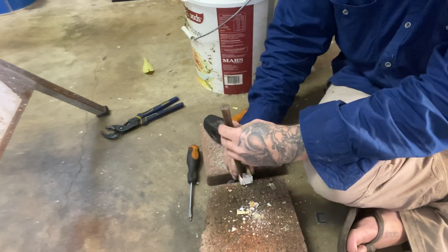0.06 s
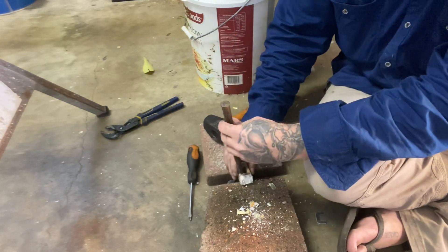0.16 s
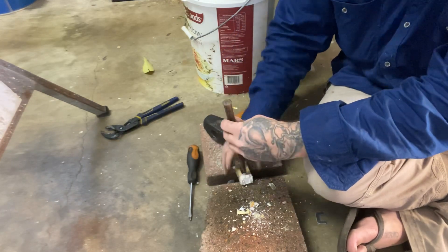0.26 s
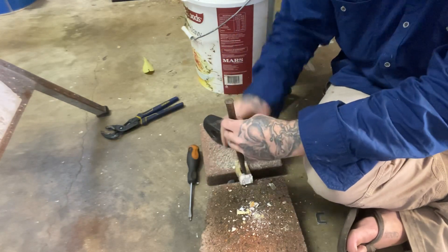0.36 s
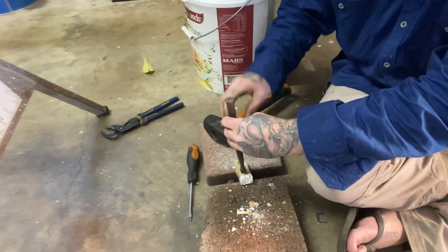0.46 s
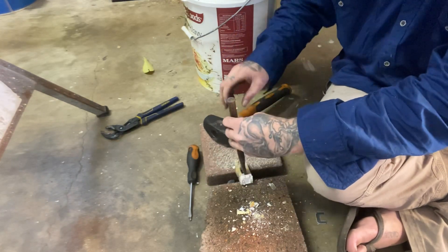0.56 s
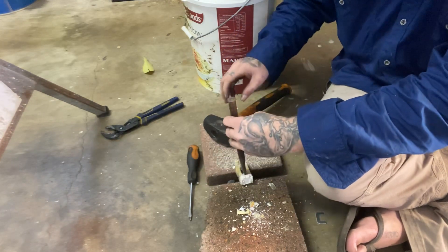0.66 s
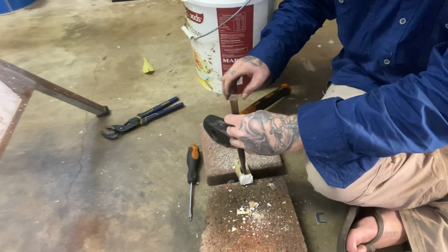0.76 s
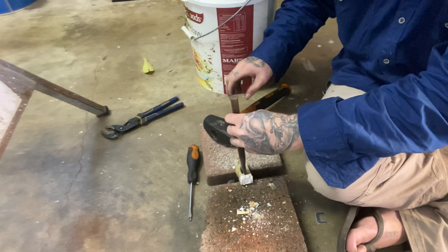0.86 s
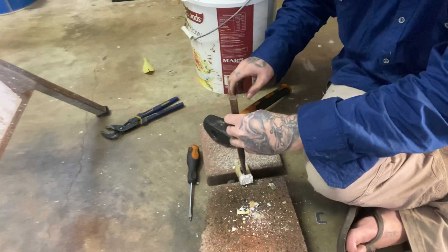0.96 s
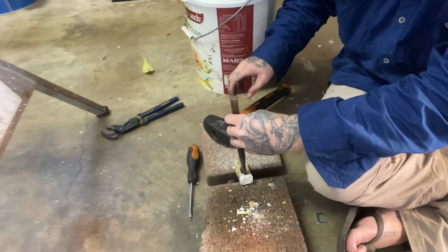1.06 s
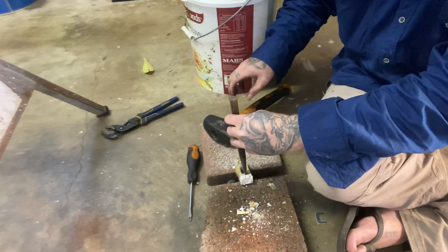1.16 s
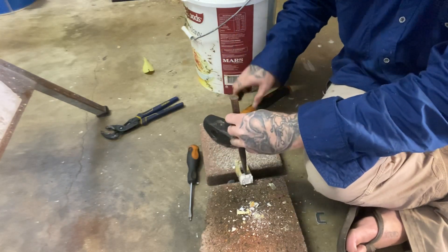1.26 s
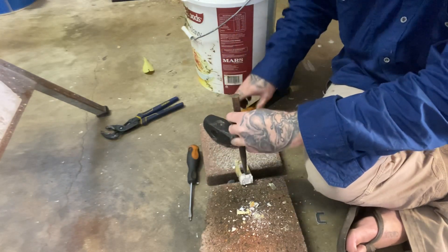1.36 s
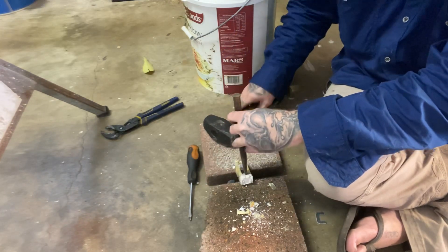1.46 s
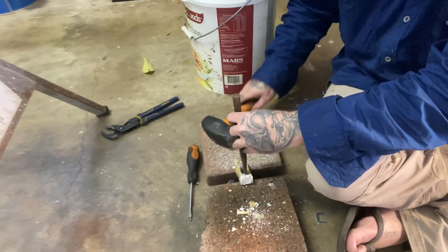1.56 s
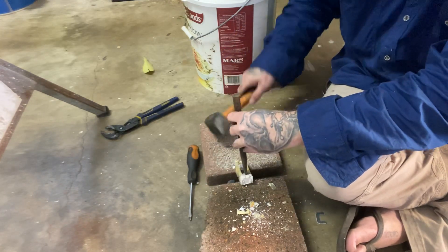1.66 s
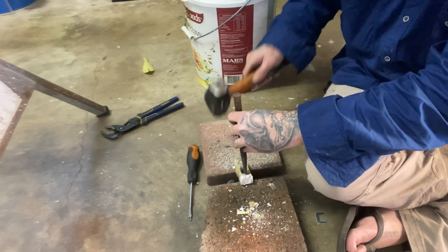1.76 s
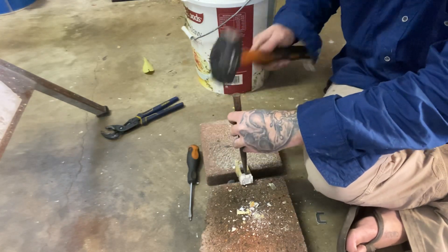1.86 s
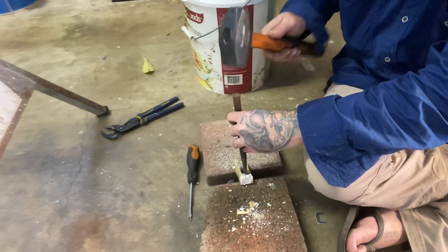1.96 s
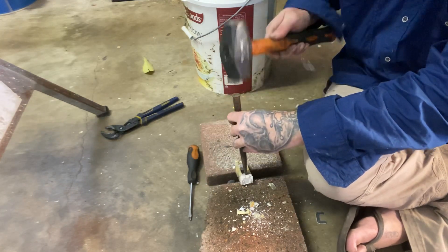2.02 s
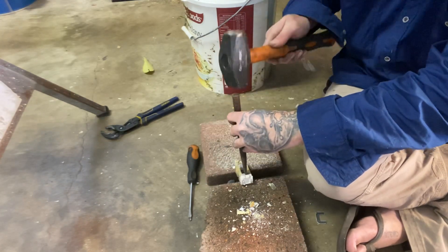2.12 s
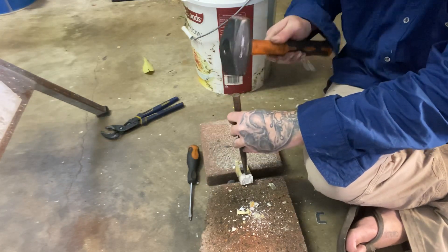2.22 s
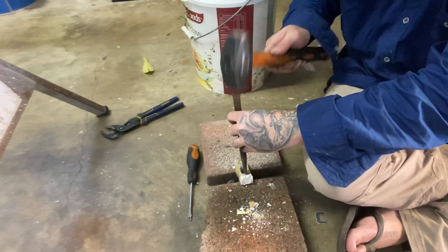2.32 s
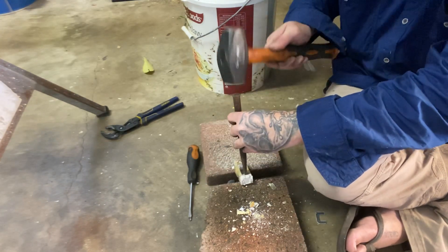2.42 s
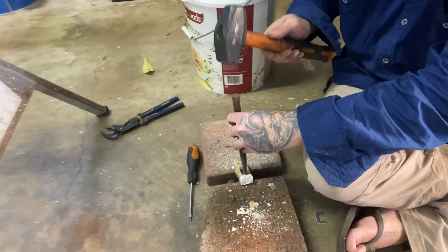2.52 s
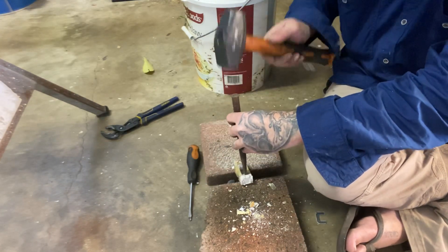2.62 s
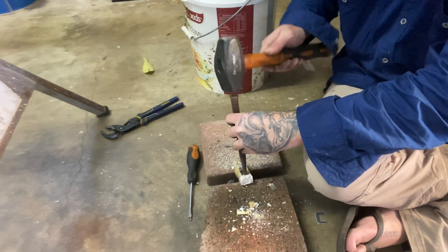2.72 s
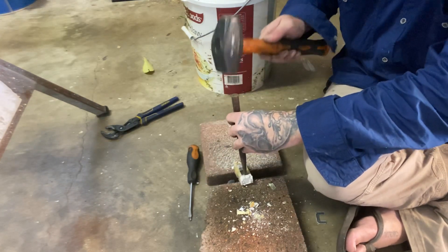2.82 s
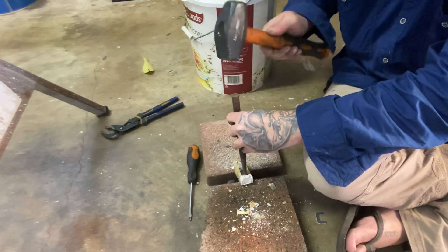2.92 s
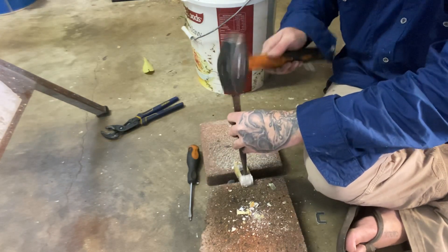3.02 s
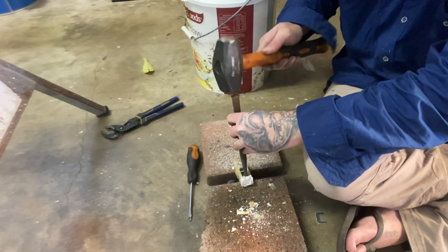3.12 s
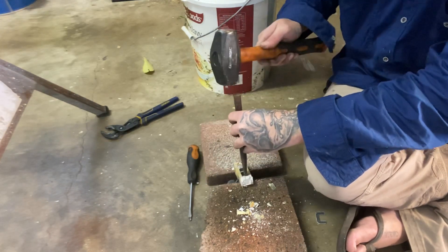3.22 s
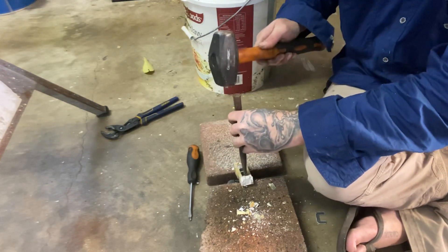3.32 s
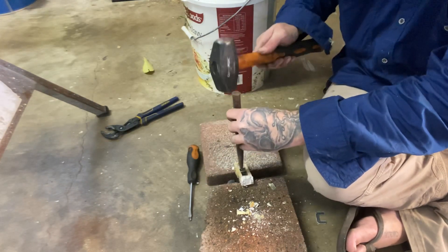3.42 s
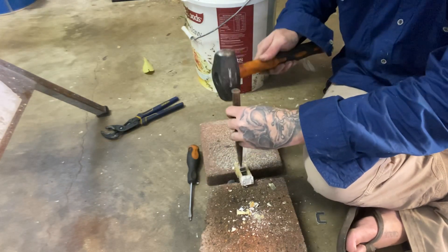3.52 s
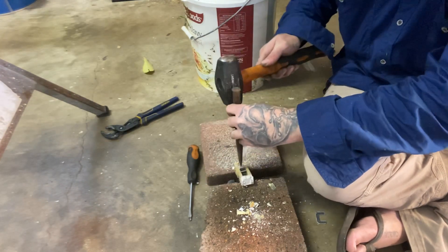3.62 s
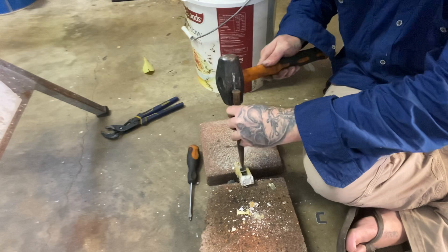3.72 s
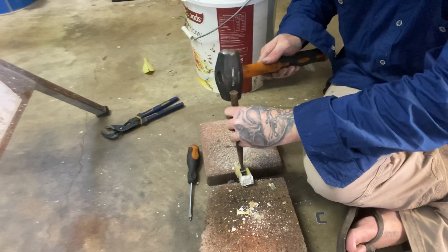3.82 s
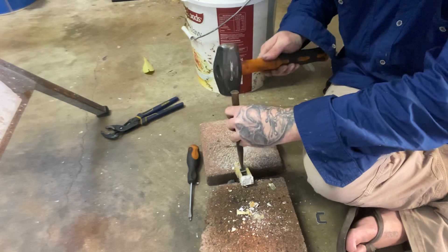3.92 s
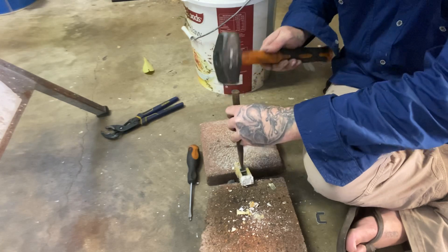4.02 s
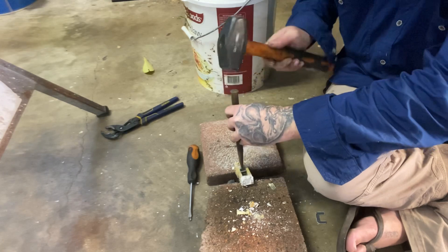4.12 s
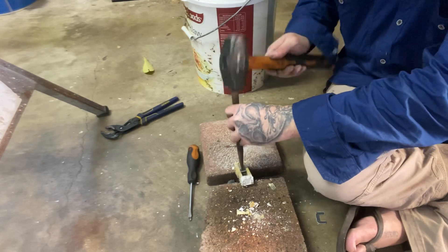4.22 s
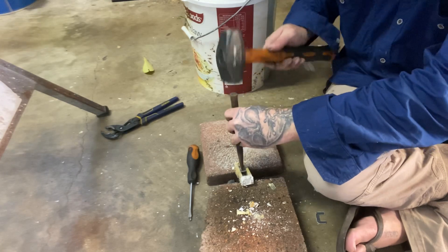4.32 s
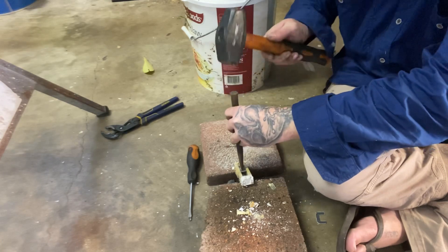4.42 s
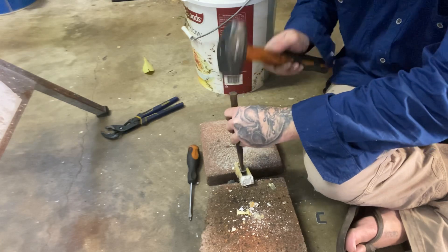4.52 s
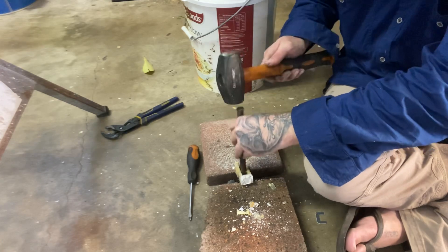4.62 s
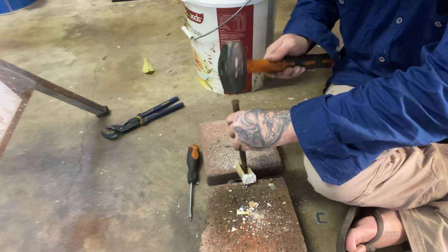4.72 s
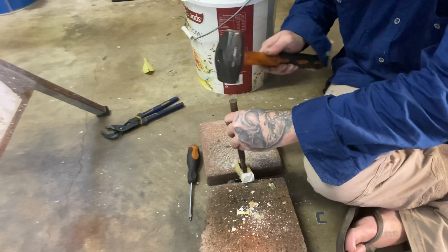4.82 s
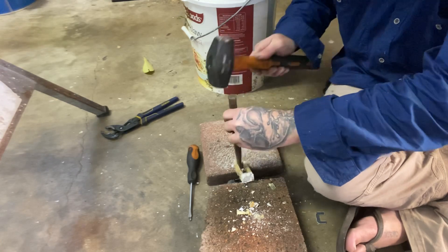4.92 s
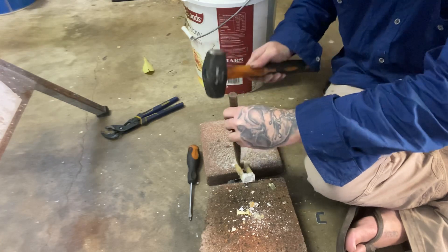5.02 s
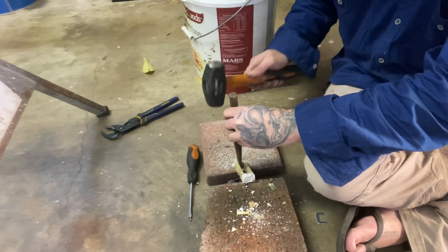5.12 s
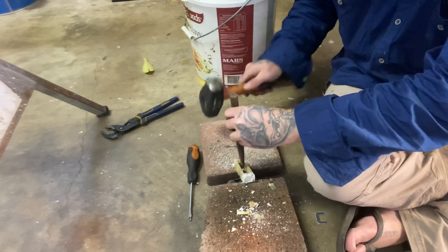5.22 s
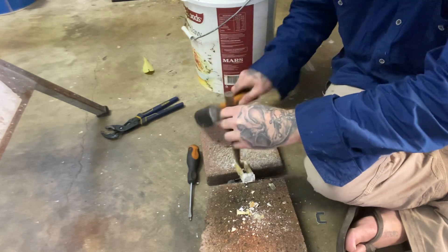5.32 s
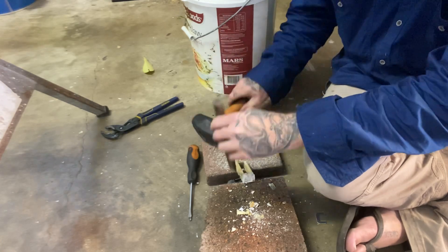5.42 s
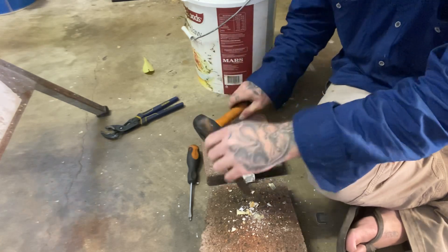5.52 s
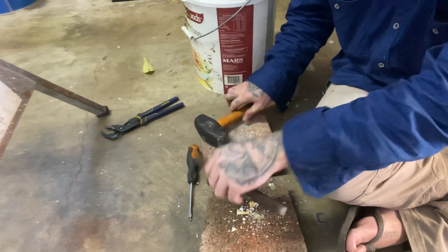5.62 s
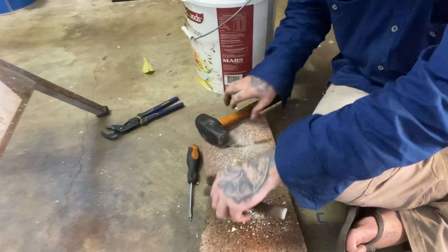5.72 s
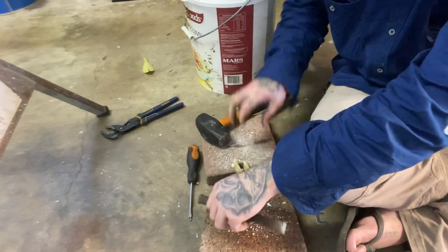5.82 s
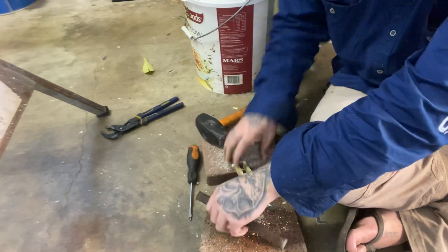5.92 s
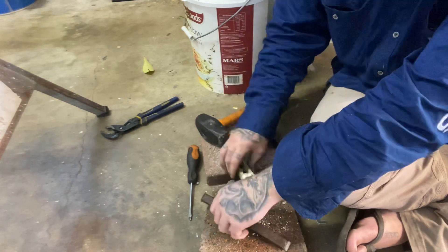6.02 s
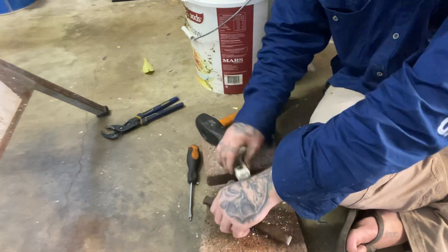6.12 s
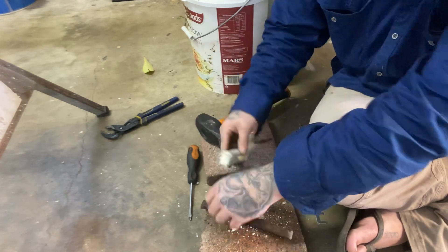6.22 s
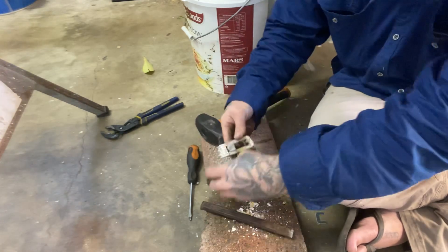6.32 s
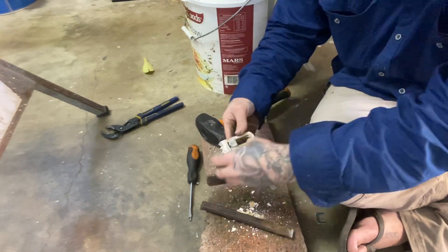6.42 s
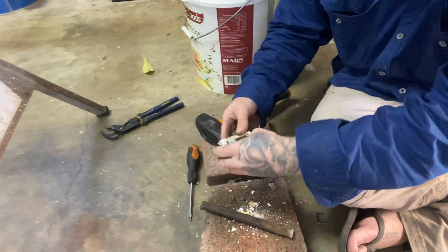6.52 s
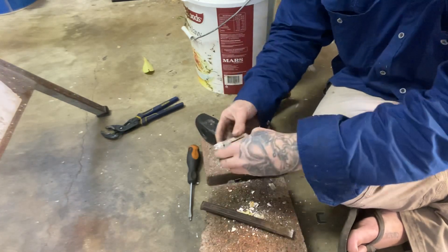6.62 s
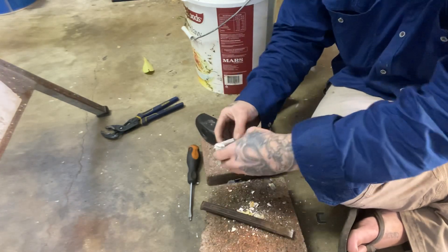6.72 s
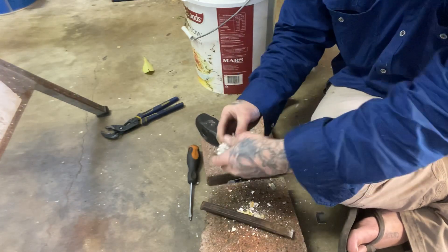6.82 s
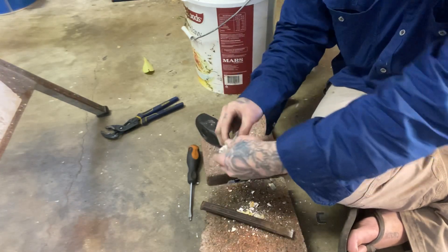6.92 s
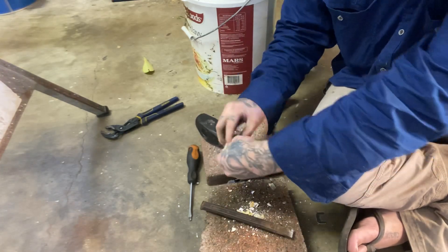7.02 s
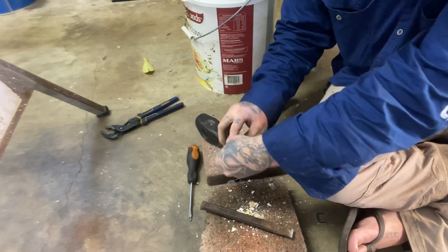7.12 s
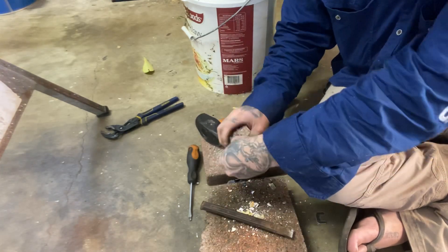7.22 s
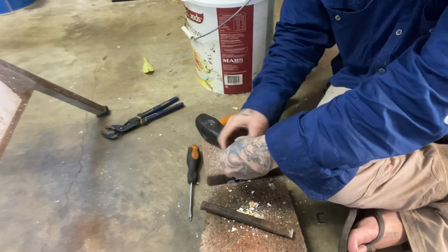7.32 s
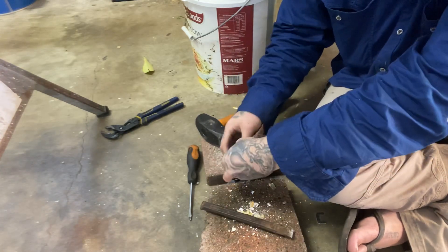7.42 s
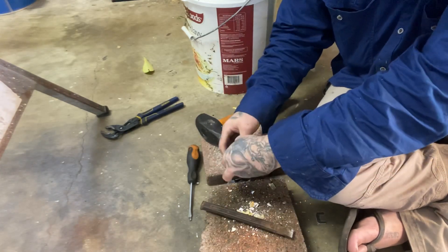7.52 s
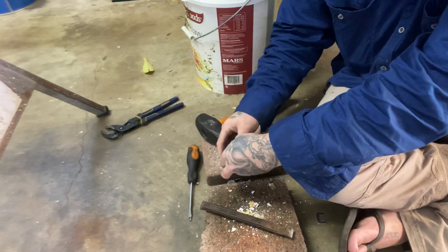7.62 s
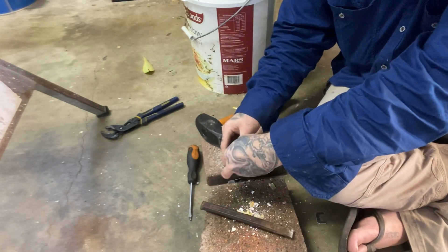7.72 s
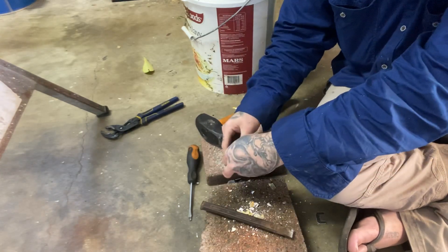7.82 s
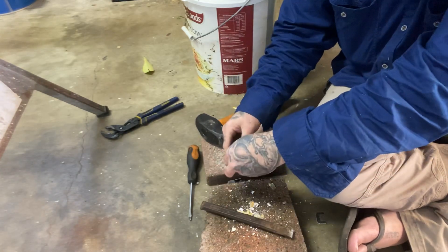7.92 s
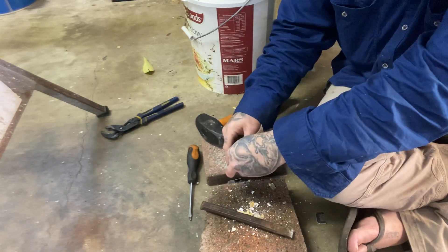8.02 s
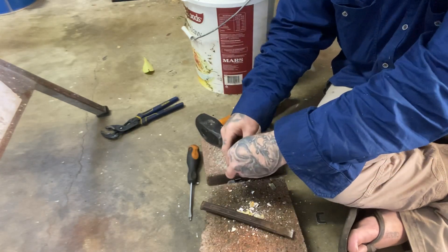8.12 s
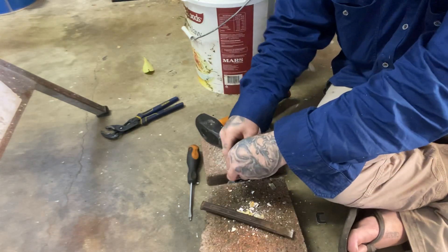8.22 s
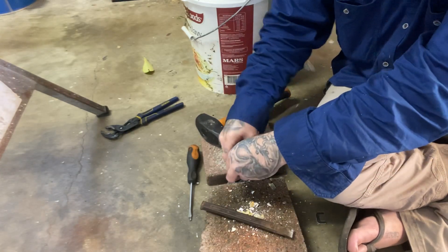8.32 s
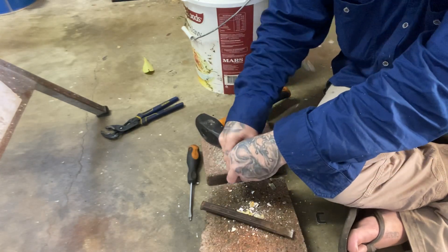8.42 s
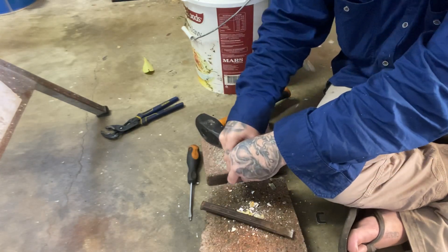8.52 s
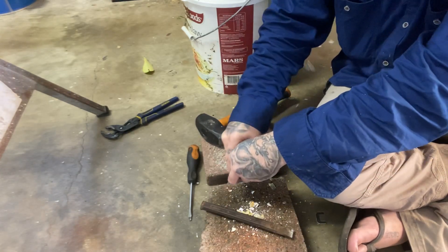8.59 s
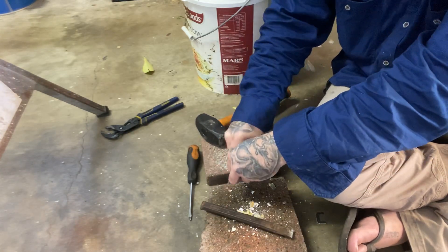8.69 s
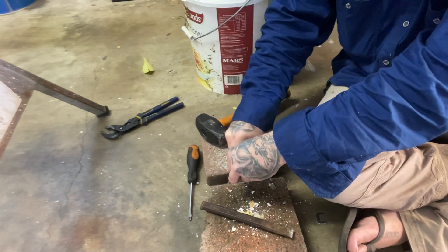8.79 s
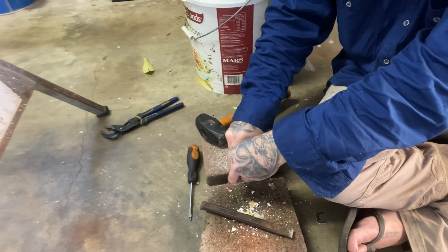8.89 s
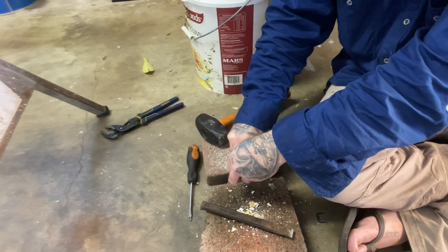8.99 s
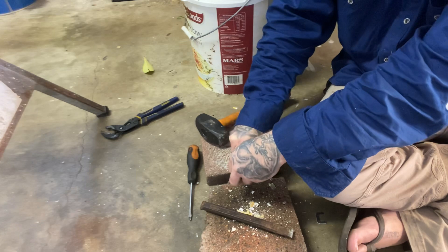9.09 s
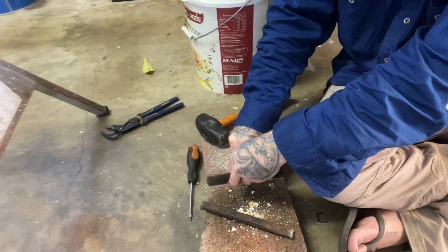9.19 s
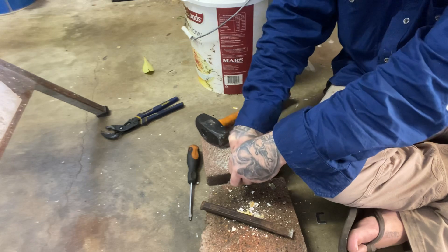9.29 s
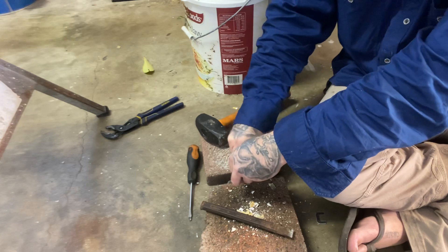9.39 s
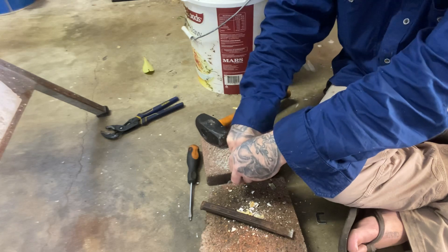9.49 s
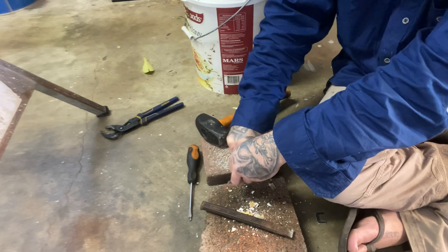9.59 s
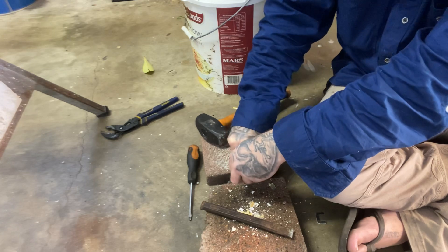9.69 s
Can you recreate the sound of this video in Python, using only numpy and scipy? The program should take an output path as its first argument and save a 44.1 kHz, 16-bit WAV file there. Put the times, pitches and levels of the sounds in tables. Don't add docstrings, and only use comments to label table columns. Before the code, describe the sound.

In a concrete garage, a club hammer cracks against a hand-held steel chisel over bricks, then tools clatter down and the chisel rings, with distant parrot screeches.

```python
import sys
import numpy as np
from scipy import signal
from scipy.fft import rfft, irfft
from scipy.io import wavfile
from scipy.ndimage import uniform_filter1d

SR = 44100
rng = np.random.default_rng(int(sys.argv[2]) if len(sys.argv) > 2 else 0)


def output_pcm(signal):
    pcm = np.clip(np.atleast_2d(signal).T, -1, 1) * 32767
    wavfile.write(sys.argv[1], SR, np.round(pcm).astype(np.int16))


def gain_from_decibels(decibels):
    exponent = np.asarray(decibels, float) / 20
    return 10 ** exponent


N = 429975
TIME_S = np.arange(N) / SR

# freq_hz, density_db_per_hz
RUMBLE_SPECTRUM = [(30, -17), (50, -10.5), (67, 4.5), (85, -2), (120, -15), (160, -27)]
# freq_hz, density_db_per_hz
SHUFFLE_SPECTRUM = [(110, -13.5), (200, -1), (280, -3), (400, 3), (550, -12.5), (1000, -17), (1400, -24)]
# freq_hz, density_db_per_hz
HISS_SPECTRUM = [(600, -20.5), (900, -2.5), (2000, -0.5), (4000, -7), (6500, -11.5), (7500, -15.5),
                 (11000, -19.5), (12500, -38)]
# peak_s, level_db, rise_s, fall_s
SHIFTS = [(0.0, -69, .1, 0.21), (0.581, -82, 0.46, 0.61), (1.11, -63.5, 0.12, .5), (1.25, -55, 0.19, 0.29),
          (1.409, -67.5, 0.086, 0.28), (1.65, -48.5, 0.31, .2), (1.98, -73, 0.46, 1), (3.94, -76, .8, 1.1),
          (5.03, -68.5, 0.33, .2), (6.2, -53.5, .3, 0.38), (5.43, -62.5, .4, .3), (6.85, -70.5, 0.15, 0.21),
          (7.3, -74, 0.39, .5), (7.55, -70.5, 0.87, 1.2), (8.85, -73.5, 0.26, 2.5), (9.3, -75.5, 0.96, 1.1)]
# loudest_s, level_db, rise_s, fall_s, first_voice_hz
SCREECHES = [(0.2, -58, .6, 0.65, 3032), (0.86, -60, 0.27, 0.7, 2930), (1.441, -59.5, 0.43, 0.66, 2923),
             (2.06, -61.5, 0.35, 0.29, 2697), (3.64, -82, 0.11, 0.38, 2790),
             (4.419, -62.5, 0.29, 0.43, 2950), (7.57, -56.5, .4, 0.55, 3170)]
# freq_hz, density_db_per_hz
RASP_SPECTRUM = [(1700, -18), (2200, -2), (4300, 2.5), (4700, -12), (6500, -2), (7100, -26)]
# peak_s, pitch_hz, level_db, rise_s, fall_s
STEADY_NOTES = [
    (2.41, 3049, -50, .06, .3),
    (2.72, 3042, -52, .02, .3),
    (3.06, 3037, -52, .02, .3),
    (4.5, 2940, -62, .2, .2),
    (5.25, 2192, -78, .3, .3),
]
SCRAPE_TIMES_S = (0.59, 3.79, 6.09, 6.55, 7.9, 8.028, 8.295, 8.48, 3.33, 4.93, 6.83, 7.06, 7.2, 0.78, 0.08)
# level_db, rise_s, fall_s
SCRAPE_SWELLS = [(-75, .05, 0.089), (-68.5, 0.078, 0.22), (-54, 0.06, 0.04), (-77.5, 0.37, 0.34),
                 (-69, 0.053, 0.091), (-69, 0.045, 0.11), (-68.5, 0.083, 0.078), (-77, 0.061, 0.086),
                 (-60, .3, 0.12), (-60, 0.14, .1), (-77, 0.44, 0.62), (-75.5, 0.17, 0.27), (-73, .15, 0.45),
                 (-72.5, 0.24, 0.35), (-74.5, .2, 0.56)]
# freq_hz, density_db_per_hz
GRIT_SPECTRUM = [(700, -8.5), (1200, -3), (2500, 0.36), (5000, -5), (10000, -5)]
# start_s, peak_db, bass_weight_db_per_octave, hardness_db_per_octave
CLICKS = [(0.569, -52, 3, 1.5), (3.744, -50, -3, 2), (3.775, -61, 2, -7), (3.933, -63, -2, -6),
          (4.784, -69.5, -4, 12), (4.82, -56, -1.5, 3), (4.862, -60, -8, 4), (4.885, -62.5, -7, 7.5),
          (6.51, -84, -6, 12.5), (6.531, -79, -5, 9), (6.558, -87, -5.5, 11), (6.669, -83, -8, 12),
          (8.67, -75.5, -3, -6), (9.713, -87, -7, 8), (3.3373, -49, -8, 6), (3.4094, -66, 4, 7.5),
          (3.4364, -63.5, 5, 3), (3.7304, -70, -4, 8), (4.7526, -47, -4, -7), (4.8105, -54, 0, 9),
          (4.8494, -51, -8, 4.5), (4.8698, -53, 0.5, 3), (4.9294, -54, -5, 8.5), (4.9494, -58, -10, 0.2),
          (5.2244, -76.5, 3.5, -2.5), (6.2724, -56, -5, 5), (6.7764, -75.5, -10.5, 14),
          (7.3224, -39.5, -5, 1.5), (7.3282, -32.5, -14, -4.5), (7.8875, -59, -2, 6),
          (7.9114, -53.5, -4, 1.5), (8.0122, -53.5, -4.5, 3), (8.031, -58.5, -6, 6), (8.06, -68.5, 1.5, 7),
          (8.149, -73.5, 2, 8), (8.4143, -61, -2, -1), (8.7994, -72, -6, 4.5), (9.3994, -71.5, -12, 7),
          (3.222, -62, -6, 9), (6.712, -80, -8, 8.5), (6.828, -72, -7.5, 4), (6.975, -76, -8, 4),
          (7.05, -78, -8, 3), (7.075, -76, -8, 3), (7.19, -74, -8, 8.5)]
# freq_hz, level_db
CLICK_BODY = [(150, 1.5), (600, -1.5), (1900, 1.5), (4600, 1.5), (10000, 1.6), (16000, -4.5)]
# start_s, peak_db, bass_weight_db_per_octave, hardness_db_per_octave
KNOCKS = [(0.214, -71, 9, -12), (1.082, -72, 2, -4), (1.102, -68, 5.5, -5), (1.171, -55.5, -7, 4),
          (1.207, -52.5, 3, -15), (1.221, -55, 3.5, -6), (1.409, -62.5, 3.5, -6), (1.601, -24, -9, -13),
          (1.648, -40, -2, -4.5), (2.045, -67, 7, -8), (6.829, -58.5, 1, -12), (6.852, -61, -2, -9.5),
          (6.876, -60, -3, -16), (6.905, -63, -2, -12), (7.135, -55, -3, -5), (7.156, -48.5, 2.5, -8),
          (7.208, -57.5, 0.86, -11), (8.756, -63.5, -1.3, -2.5)]
# freq_hz, level_db
KNOCK_BODY = [(100, 0.93), (400, 6), (1150, -0.5), (2300, 3.5), (5500, -1.7), (8800, 1)]
# freq_hz, gain_db
SOFT_CONTACT = [(1800, 0.5), (2800, -9), (6000, -21)]
# start_s, pitch_hz, level_db, t60_s
BODY_RINGS = [(2.3565, 1180, -18, .03), (2.37, 1200, -30, .15), (2.702, 290, -29, .04),
              (5.462, 3760, -42, .08), (3.04, 1750, -22, .02), (2.702, 1500, -34, .12),
              (6.1, 305, -33, 0.063), (2.354, 2150, -21.5, 0.017), (2.7, 1400, -22.5, 0.014),
              (2.6995, 1800, -19, 0.01), (3.042, 330, -23.5, .04), (4.237, 2160, -30, 0.038),
              (4.573, 2400, -25, .02), (4.62, 2210, -42, .07), (4.245, 2350, -36, .05),
              (0.57, 1300, -58, .05), (5.47, 200, -36, .08), (1.27, 1010, -66, .15),
              (1.601, 1080, -34, .015), (4.255, 1150, -40, .04), (5.67, 72, -36, 0.24),
              (2.71, 80, -38, .25), (3.05, 80, -38, .25), (5.49, 3730, -52, .12), (5.53, 1560, -37.5, .05),
              (3.04, 200, -30, .05), (2.702, 170, -32, .05), (5.462, 950, -18, 0.038),
              (5.462, 2700, -38, 0.072), (5.462, 1800, -28, .03), (1.602, 1100, -36, .02),
              (1.221, 349, -37, 0.04), (1.108, 420, -51.5, 0.0296), (6.131, 3030, -43.5, 0.096),
              (4.5855, 2300, -29, .02), (2.356, 79, -35.5, .12), (2.702, 120, -31.5, 0.1),
              (3.04, 115, -28, 0.063), (3.04, 44, -33, 0.31), (2.71, 36, -36, .25),
              (5.463, 85, -33.5, 0.13), (5.66, 105, -37, 0.11), (7.156, 1110, -57.5, 0.022),
              (5.658, 1250, -18.5, 0.013), (5.683, 1100, -32.5, 0.0069), (1.648, 1200, -39.5, 0.0093)]
HEAD_HZ = (8064, 10790, 14200, 14960, 15040, 15150)
# skidding_db, struck_db, t60_s
HEAD_MODES = [(-20.5, -13, 0.05), (-17, -19, 0.066), (-28, -8, .04), (-3, -22, .09), (4, -23, .09),
              (-4, -27, .09)]
# peak_s, level_db
SKIDS = [(3.2, -66), (3.25, -62), (3.3, -62), (3.342, -58), (3.38, -58), (3.41, -56), (3.44, -53.5),
         (4.66, -62.5), (4.75, -70), (4.814, -45), (4.845, -46), (4.872, -44), (4.9, -48), (4.935, -47),
         (4.97, -56), (5.05, -74)]
CHISEL_HZ = (1824, 2482, 3034, 4686, 4689, 6334, 8040, 8340, 11535, 12930, 14030, 15495)
# dropped_db, settling_db, tapped_in_fist_db, t60_s, left_minus_right_db, left_lead_rad
CHISEL_MODES = [(-5.5, -23, -3, 0.92, -4.5, 0.6), (-14, -1.5, 1.5, 0.96, -4.5, 0.27),
                (-26, -15.5, -19, 0.52, -0.5, -.5), (-9.5, 6.5, -25, 1.35, -6.5, -1.5),
                (-5.5, -8, -26, .5, -5, -2.4), (-12, -14.5, -23.5, 1.4, -5, 0.98),
                (-32.5, -9, -23.5, 0.69, 1, -1.65), (1, -3.5, -28, 0.55, -1, -1.2),
                (-24, -23, -51.5, 0.61, .5, 0.4), (-22, -48, -61.5, .15, -1, -0.85),
                (-23.5, -32, -58.5, .4, -0.5, -1.5), (-20.5, -29, -61.5, .5, 0, 0.1)]
# start_s, level_db, freedom_0_to_1, silenced_after_s
CHISEL_RINGS = [
    [(5.949, -24.5, .45, 0.17), (6.1, -32.5, 0.95, 0.21)],
    [(6.099, -36, 0.97, 1.3), (6.131, -38, 0.07, 0.52)],
    [(2.352, -18.5, 0, 0.36), (2.698, -35.5, 0.08, .3), (3.039, -47, 0.1, .3), (3.745, -40, 0.05, 0.3),
     (3.777, -54, .1, .2), (3.935, -60, 0.04, .2), (4.235, -38, 0.04, .3), (4.573, -33, 0.07, 0.35)],
]
# time_s, high_modes_db, left_minus_right_db, lowest_mode_db
CHISEL_ROLL = [(5.99, -1.5, -2, -2.5), (6.08, -1.5, 0, -9), (6.12, -1.5, 2, -5), (6.2, 1.5, 2.5, 2),
               (6.262, -11, -1, 2), (6.3, -0.5, -1, -7), (6.335, 2, -4, -26), (6.55, 2, -2.5, -26),
               (6.76, 1.5, -1.5, -26), (7.2, -3, -1.5, -30)]
# start_s, peak_db, bass_weight_db_per_octave, hardness_db_per_octave
DROPS = [
    (5.459, -7, -8, -5),
    (5.476, -20, -3.5, -5.5),
    (5.658, -18.5, -5, -6),
    (5.683, -22, -6, -14),
    (5.949, -23, -3, 0),
    (6.098, -24, -5.5, -5),
    (6.131, -38, 0, 3),
]
# freq_hz, level_db
DROP_BODY = [(70, -6), (300, 4), (600, 2), (1150, -0.5), (2000, -2.5), (3500, -7), (5500, -15), (8800, -18)]
# freq_hz, gain_db
DROP_ACCENTS = [
    [(500, -3), (1900, 6), (3300, -4), (3750, 7), (5400, 7), (10000, -5)],
    [(1900, 5), (3750, 6)],
    [(920, 3), (1500, -4), (2500, -5), (3000, 4.5), (4200, 4.5)],
    [(1500, -3), (2000, -5)],
    [(500, 4), (1500, -4), (2950, 5), (3900, -4), (5400, 4)],
    [(2100, -8), (2950, 6), (3750, -6)],
    [(3000, 3.3)],
]
# start_s, peak_db, bass_weight_db_per_octave, hardness_db_per_octave
BLOWS = [
    (2.352, -7.5, -8.5, -3.5),
    (2.699, -11, -4, -2),
    (3.038, -13, -3, -1.5),
    (4.235, -19.5, -10, 1.5),
    (4.572, -16, -12, 2.5),
    (4.585, -22, -12.5, 2),
]
# freq_hz, level_db
BLOW_BODY = [(60, -16.5), (130, -8.5), (300, 2.5), (620, -2.5), (1050, 3), (2300, 1.5), (5500, 0.88),
             (8800, -2)]
# freq_hz, gain_db
BLOW_ACCENTS = [
    [(200, -8), (400, -5), (980, 3), (1180, 3), (1550, -4), (2500, -4), (3300, -4), (5100, 4), (6100, -9)],
    [(500, -4), (780, -12), (2950, 2), (3750, -4), (4300, -5), (5400, 4), (6900, -2)],
    [(400, -8), (950, -5), (2500, 3), (3300, -4), (4500, 4), (6100, 4), (6900, -4)],
    [(190, -12), (1150, -5), (2100, 2), (2500, 2), (2950, -4), (5400, 3), (6900, 3.5), (10000, -5)],
    [(190, -12), (1500, -4), (2350, 4), (3300, -5), (4500, 4), (5500, -3), (6200, 3), (10000, -4)],
    [(190, -12), (1500, -4), (2250, 5), (3300, -5), (4600, 3)],
]
# freq_hz, t60_s
ROOM_T60 = [(60, 1), (200, 0.54), (500, 0.57), (1200, 0.5), (3000, 0.55), (7000, .5), (10000, .36),
            (15000, 0.25)]
# freq_hz, level_db
ROOM_COLOUR = [(60, 4), (130, 2.5), (300, 5), (600, 0.5), (1500, -3), (4000, -1), (7500, 0), (9000, -3.5),
               (15000, -6.5)]
# delay_s, level_db, left_minus_right_db
ECHOES = [(.006, -16.5, 6), (0.0151, -8, -3), (0.03, -16, 2.5), (.046, -16.5, -2)]
# freq_hz, gain_db
PHONE_RESPONSE = [(100, -2), (7000, -1.5), (7600, -14.5), (8300, -2.5), (11800, -6), (12400, -26),
                  (13500, -26), (14400, -13), (16000, -15)]

BLOW_PIVOT_HZ, CLICK_PIVOT_HZ = 1150, 1900


def on_log(table, hz):
    table_hz, value = np.transpose(table)
    return np.interp(np.log(hz), np.log(table_hz), value)


def colour(x, table):
    hz = np.maximum(np.fft.rfftfreq(x.shape[-1], 1 / SR), 1)
    return irfft(rfft(x) * gain_from_decibels(on_log(table, hz)), x.shape[-1])


def high_pass(x, cut_hz):
    return signal.sosfilt(signal.butter(2, cut_hz, "high", fs=SR, output="sos"), x)


def add(track, start_s, sound):
    i = int(start_s * SR)
    track[..., i:i + sound.shape[-1]] += sound[..., :N - i]


def noise(spectrum, likeness):
    hz = np.maximum(np.arange(N // 2 + 1) * SR / N, 1)
    in_band = (hz > spectrum[0][0]) & (hz < spectrum[-1][0])
    mid, side = irfft(rfft(rng.standard_normal((2, N))) * gain_from_decibels(on_log(spectrum, hz)) * in_band, N)
    c = np.clip(likeness, -1, 1)
    pair = np.sqrt(1 + c) * mid + np.sqrt(1 - c) * side * np.c_[[1, -1]]
    return pair / np.std(mid) / np.sqrt(2)


def walk(rate_hz):
    hold = int(SR / rate_hz)
    steps = np.repeat(rng.standard_normal(N // hold + 1), hold)
    return 1.4 * uniform_filter1d(uniform_filter1d(steps, hold), hold)[:N]


def swell(peak_s, level_db, rise_s, fall_s):
    before = (peak_s - TIME_S) / max(rise_s, 1e-3)
    after = (TIME_S - peak_s) / max(fall_s, 1e-3)
    return gain_from_decibels(level_db - 40 * np.maximum(before, after))


def ring(hz, level_db, t60_s, lag_s, length_s, phase_rad=0):
    hz = np.c_[hz]
    t = np.maximum(np.arange(int(length_s * SR)) / SR - np.c_[lag_s], 0)
    push = (1 - np.exp(-t * hz * 4.3)) ** 2
    decay = gain_from_decibels(np.c_[level_db] - 60 * t / np.c_[t60_s])
    return np.sum(push * decay * np.sin(2 * np.pi * hz * t + phase_rad), axis=0)


def background():
    rumble = gain_from_decibels(-65 + 2.5 * walk(9.7)) * noise(RUMBLE_SPECTRUM, 0.84)
    scuff_db = 3 * walk(30)
    drift_db = 1.5 * walk(1.5) + walk(20)
    shift_gain = gain_from_decibels(-87) + sum(swell(*row) for row in SHIFTS)
    shuffle = shift_gain * gain_from_decibels(scuff_db) * noise(SHUFFLE_SPECTRUM, 0.3)
    return rumble + shuffle + gain_from_decibels(-86.5 + drift_db) * noise(HISS_SPECTRUM, 0.2)


def parrot():
    scoop, second_ratio, third_ratio = .12, 1.36, .88
    overtone_db, overtone_db_per_khz = -8, -41
    out, rasp = np.zeros(N), noise(RASP_SPECTRUM, 0.92)[0]
    for peak_s, level_db, rise_s, fall_s, first_hz in SCREECHES:
        second_hz = second_ratio * first_hz
        still_to_rise = np.clip((peak_s - TIME_S) / rise_s, 0, 1)
        bend = 1 - scoop * still_to_rise
        phases = []
        for hz in (first_hz, second_hz, third_ratio * second_hz):
            shake = 1 + .02 * walk(450) + .018 * walk(25)
            phases.append(2 * np.pi * np.cumsum(hz * bend * shake) / SR)
        first, second, third = phases
        over_db = overtone_db + overtone_db_per_khz * (first_hz / 1000 - 3) - 25 * still_to_rise
        voice = np.sin(first) + gain_from_decibels(over_db + 3.0) * np.sin(2 * first) + gain_from_decibels(over_db - 13.5) * np.sin(3 * first)
        voice = voice + gain_from_decibels(-3.5) * np.sin(second) + gain_from_decibels(-9.5) * np.sin(third) + gain_from_decibels(-6.5) * rasp
        gain = uniform_filter1d(swell(peak_s, level_db, rise_s, fall_s), size=3000)
        out += gain * gain_from_decibels(1.9 * walk(120)) * voice
    return out


def steady_notes():
    out = np.zeros(N)
    for peak_s, hz, level_db, rise_s, fall_s in STEADY_NOTES:
        gain = swell(peak_s, level_db, rise_s, fall_s) * gain_from_decibels(4.5 * walk(30))
        out += gain * np.sin(2 * np.pi * hz * TIME_S)
    return out


def scrapes():
    gain = sum(swell(peak_s, *row) for peak_s, row in zip(SCRAPE_TIMES_S, SCRAPE_SWELLS))
    return gain * gain_from_decibels(3.4 * walk(700)) * noise(GRIT_SPECTRUM, 0.82)[0]


def impacts(hits, body, pivot_hz, t60_s, lag_s, trim_db, accents=None, count=112):
    accent_octaves = .13
    out = np.zeros(N)
    for (start_s, peak_db, weight, hardness), accent in zip(hits, accents or [()] * len(hits)):
        u = rng.random((4, count))
        hz = 60 * 2 ** (8 * ((np.arange(count) + u[0]) / count) ** .75)
        octave = np.log2(np.clip(hz, body[0][0], body[-1][0]) / pivot_hz)
        tilt_db = np.where(octave < 0, -weight, hardness) * octave
        level_db = peak_db + on_log(body, hz) + tilt_db + trim_db + 2.6 * (u[1] - .5)
        for accent_hz, gain_db in accent:
            level_db = level_db + gain_db * np.exp(-(np.log2(hz / accent_hz) / accent_octaves) ** 2)
        mode_lag_s = lag_s * (.97 + 0.081 * u[2]) * (hz / 1000) ** -.7
        mode_t60_s = t60_s * (hz / 1000) ** -.6
        add(out, start_s, ring(hz, level_db, mode_t60_s, mode_lag_s, .06, 1.177 * np.c_[u[3]]))
    return out


def finger_clicks():
    taps = impacts(CLICKS, CLICK_BODY, CLICK_PIVOT_HZ, 0.019, 0.00057, -5.5, count=56)
    return taps + scrapes()


def soft_knocks():
    return colour(impacts(KNOCKS, KNOCK_BODY, BLOW_PIVOT_HZ, 0.031, .0015, -7), SOFT_CONTACT)


def body_rings():
    out = np.zeros(N)
    for start_s, hz, level_db, t60_s in BODY_RINGS:
        pair = ring([hz, 1.035 * hz], [level_db, level_db - 2.0], [t60_s, t60_s], [0., 0.], .35)
        add(out, start_s, pair)
    return out


def hammer_head():
    skid_rise_s, skid_fall_s = .03, 0.081
    hz, (skid_db, struck_db, t60_s) = np.array(HEAD_HZ), np.transpose(HEAD_MODES)
    skid_gain = sum(swell(peak_s, db, skid_rise_s, skid_fall_s) for peak_s, db in SKIDS)
    grit = skid_gain * rng.standard_normal(N) * gain_from_decibels(3.0 * walk(150))
    out = signal.fftconvolve(grit, ring(hz, skid_db - 14.5, t60_s, 0 * hz, .15))[:N]
    for start_s, peak_db, _, hardness in BLOWS:
        level_db = peak_db + 2.4 * hardness + struck_db - 9.5
        add(out, start_s, ring(hz, level_db, t60_s, 0 * hz, .15))
    return out


def chisel():
    out, hz = np.zeros((2, N)), np.array(CHISEL_HZ)
    *excited_db, t60_s, pan_db, lead_rad = np.transpose(CHISEL_MODES)
    for events, mode_db in zip(CHISEL_RINGS, excited_db):
        for start_s, level_db, freedom, stop_s in events:
            held_t60_s = t60_s * max(freedom, .02)
            sound = np.array([ring(hz, level_db + mode_db + side * pan_db, held_t60_s, 0 * hz, stop_s,
                                   np.c_[side * lead_rad]) for side in (.5, -.5)])
            release = np.minimum(np.arange(sound.shape[1])[::-1] / 400, 1)
            add(out, start_s, sound * release)
    roll_s, high_db, roll_pan_db, low_db = np.transpose(CHISEL_ROLL)
    side = np.c_[[.5, -.5]]
    turn_db = np.interp(TIME_S, roll_s, high_db, left=0) + np.interp(TIME_S, roll_s, roll_pan_db, left=0) * side
    lie_gain = gain_from_decibels(np.interp(TIME_S, roll_s, low_db, left=0))
    lowest = colour(out, [(2000, 0), (2300, -80)])
    high = colour(out, [(3400, -80), (4200, 0)])
    return out + (lie_gain - 1) * lowest + (gain_from_decibels(turn_db) - 1) * high


def hammer_blows():
    t60_s, drop_t60_s, lag_s, trim_db = 0.023, 0.02183, .0022, -7.5
    struck = impacts(BLOWS, BLOW_BODY, BLOW_PIVOT_HZ, t60_s, lag_s, trim_db, BLOW_ACCENTS)
    dropped = impacts(DROPS, DROP_BODY, BLOW_PIVOT_HZ, drop_t60_s, lag_s, trim_db, DROP_ACCENTS)
    return high_pass(struck + dropped, 190)


def garage(x, sent):
    room_db, fade_s = -33, 1
    t = np.arange(int(.8 * SR)) / SR
    hz = np.maximum(np.fft.rfftfreq(len(t), 1 / SR), 1)
    reply = np.zeros((2, len(t)))
    for delay_s, level_db, pan_db in ECHOES:
        at = int(delay_s * SR) + rng.integers(0, 6, 2)
        reply[[0, 1], at] += gain_from_decibels(level_db + np.array([pan_db, -pan_db]) / 2)
    reply = colour(reply, [(1500, 0.0), (5000, -4.5), (12000, -18.5)])
    for centre_hz in 50 * 2 ** np.arange(0, 8.5, .5):
        band = np.maximum(1 - np.abs(2 * np.log2(hz / centre_hz)), 0)
        mid, side = irfft(rfft(rng.standard_normal((2, len(t)))) * band, len(t))
        decay_db = -60 * t / on_log(ROOM_T60, centre_hz) - 20 * (t / fade_s) ** 4
        gain = gain_from_decibels(room_db + on_log(ROOM_COLOUR, centre_hz) + decay_db) * (1 - np.exp(-t / 0.001))
        width = min(centre_hz / 300, 1.1)
        reply += gain * (mid + width * side * np.c_[[1, -1]])
    direct = np.array([x * gain_from_decibels(-0.82), np.roll(x, 1) * gain_from_decibels(2.0)])
    return direct + signal.fftconvolve(sent[None], reply, axes=1)[:, :N]


def scene():
    blows = hammer_blows() + gain_from_decibels(-3.0) * parrot() + steady_notes()
    body = gain_from_decibels(5.0) * body_rings()
    knocks, clicks = soft_knocks(), finger_clicks()
    head, bar = hammer_head(), chisel()
    sent = gain_from_decibels(1.0) * blows + gain_from_decibels(-4.0) * body + gain_from_decibels(-2.0) * knocks + gain_from_decibels(-3.0) * clicks
    sent = sent + gain_from_decibels(-5.5) * bar[1] + gain_from_decibels(-5.0) * head
    near = garage(blows + body + knocks + clicks, sent) + bar + head
    return colour(high_pass(near, 69), PHONE_RESPONSE) + background()


def roll_off(x):
    return signal.sosfilt(signal.butter(12, 16470, fs=SR, output="sos"), x)


def record(dry):
    t = np.arange(int(0.014 * SR)) / SR
    lead_noise = gain_from_decibels(-32 - 60 * t / 0.022)[::-1] * rng.standard_normal(len(t))
    bright = colour(dry, [(600, -32.5), (2000, -3.0), (7000, 8.0), (8000, -31.0)])
    level = uniform_filter1d(np.abs(bright), size=100)
    earlier = np.roll(uniform_filter1d(level, size=600), 400, axis=1)
    attack = bright * np.clip(1 - 3 * earlier / (level + 1e-9), 0, 1)
    ahead = signal.fftconvolve(attack, lead_noise[None], axes=1)[:, len(t):len(t) + N - 1]
    smeared = dry + np.pad(ahead, ((0, 0), (0, 1)), mode="edge")
    return roll_off(np.tanh(1.362 * smeared) / 0.8)


dry = scene()
out = record(dry)
output_pcm(out)
```